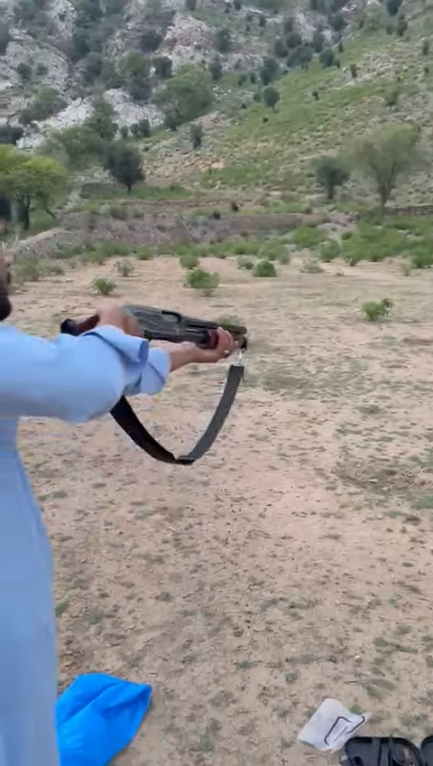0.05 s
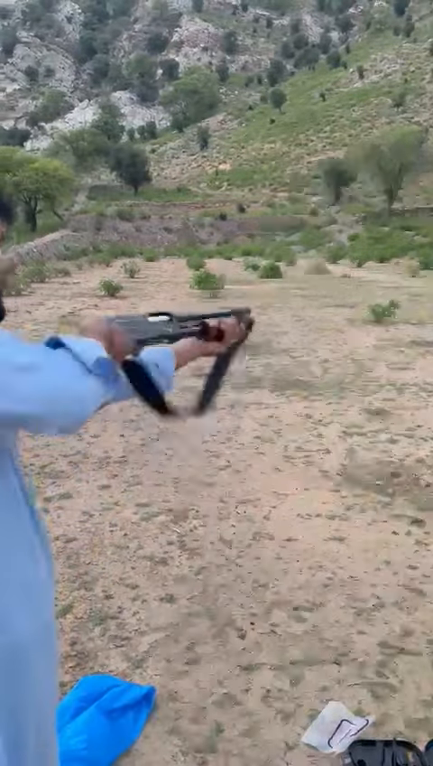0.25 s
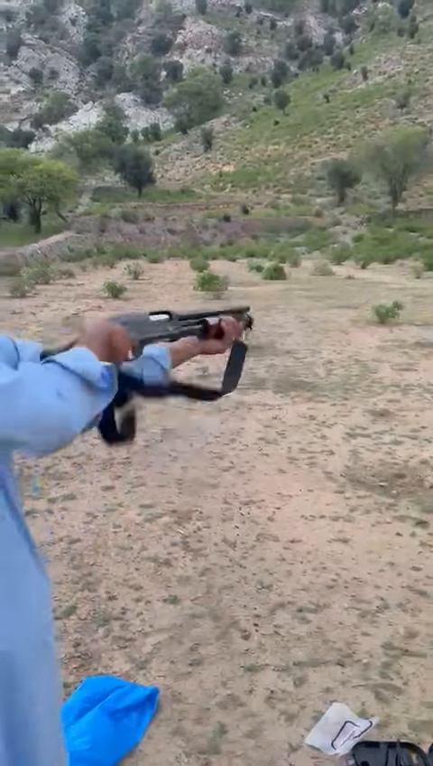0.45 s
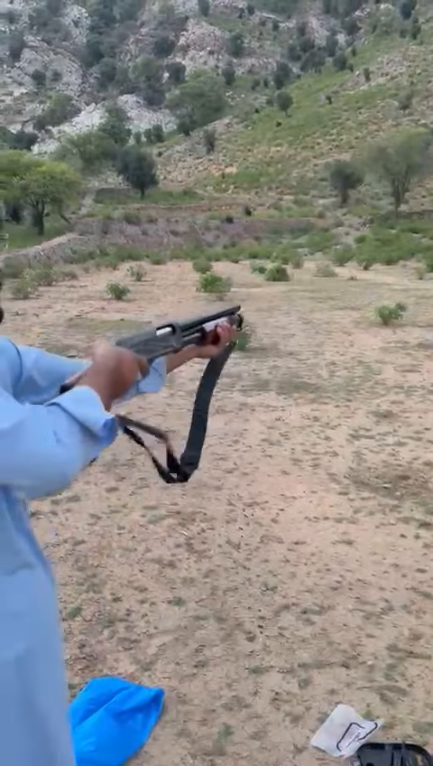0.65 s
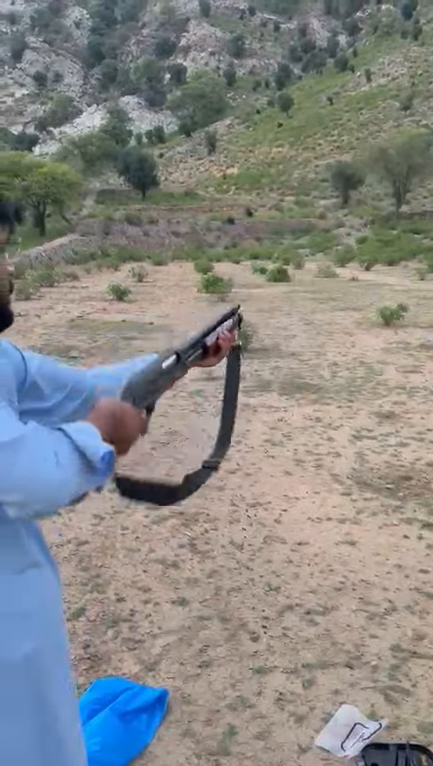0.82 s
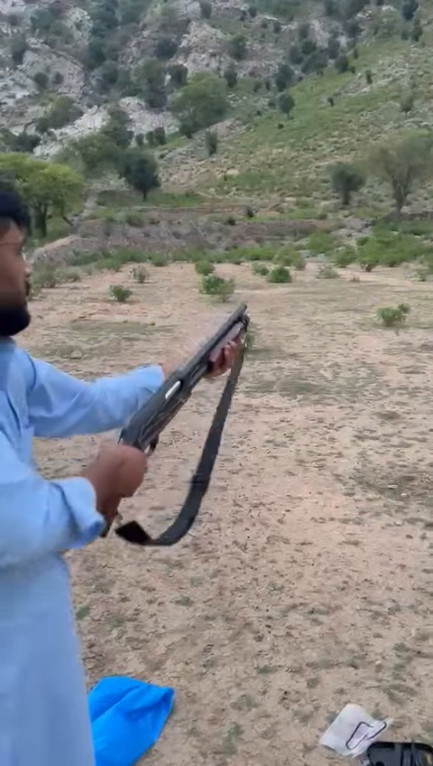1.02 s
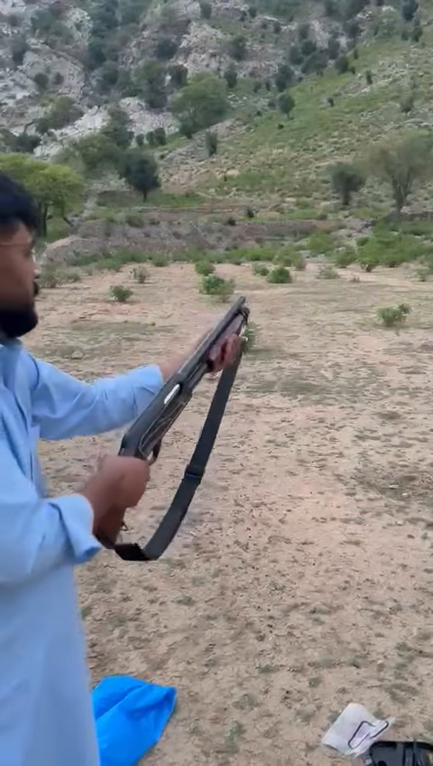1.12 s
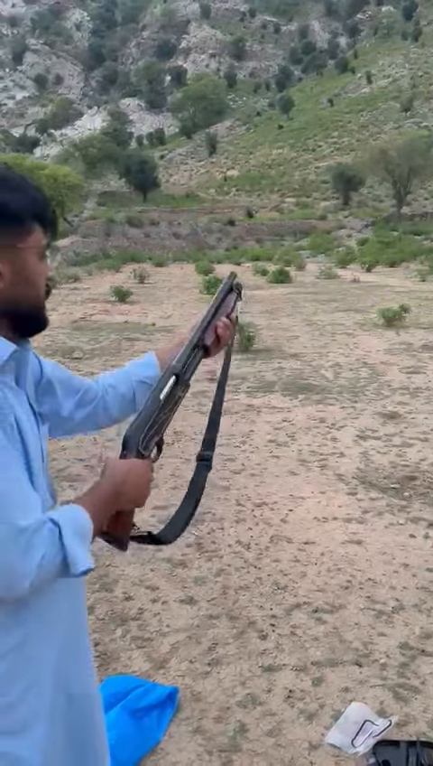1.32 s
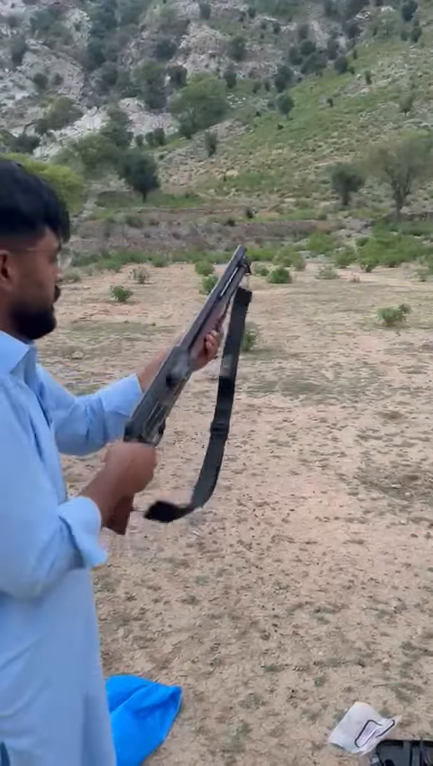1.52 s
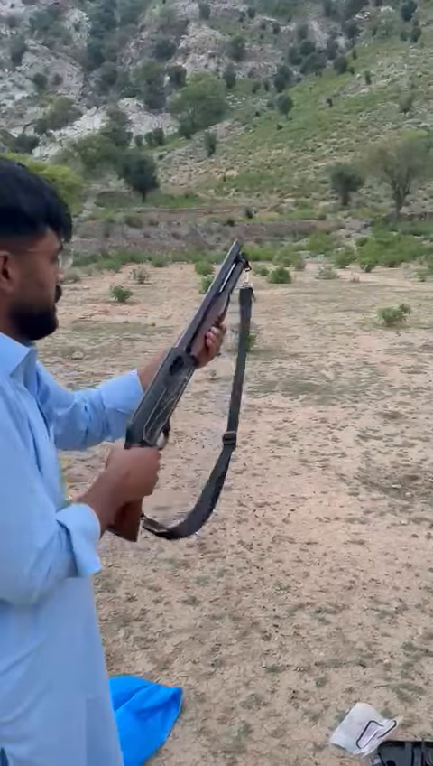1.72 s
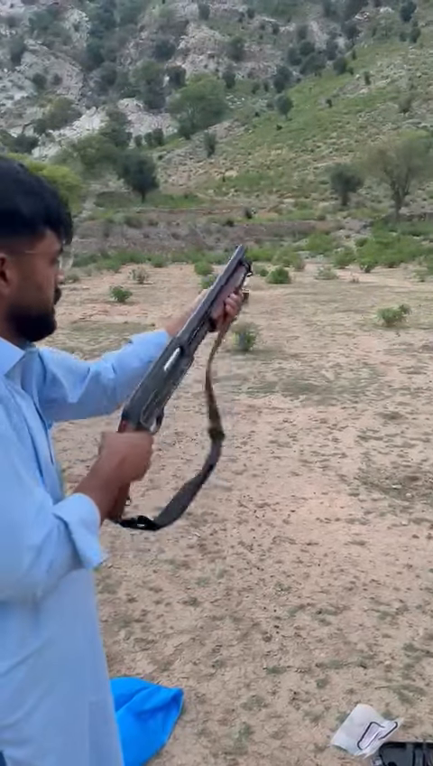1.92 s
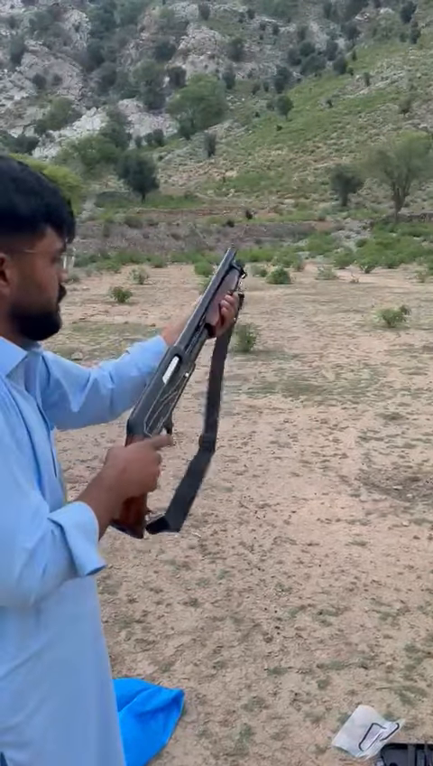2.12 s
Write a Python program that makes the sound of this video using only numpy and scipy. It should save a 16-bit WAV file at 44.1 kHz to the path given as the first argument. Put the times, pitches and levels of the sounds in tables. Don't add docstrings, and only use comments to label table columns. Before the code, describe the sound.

A single close shotgun shot in open hilly country, with thumping reflections and a long, slowly darkening echo; over it the steel pump scrapes and slams back, then forward. Phone microphone, slight hiss.

```python
import sys
import numpy as np
from scipy import signal
from scipy.fft import rfft, irfft, next_fast_len
from scipy.io import wavfile
from scipy.ndimage import uniform_filter1d

SR = 44100
rng = np.random.default_rng(int(sys.argv[2]) if len(sys.argv) > 2 else 0)


def put_to_file(sound):
    columns = np.atleast_2d(sound).T
    safe = np.clip(columns, -1, 1)
    whole_steps = np.round(safe * 32767)
    wavfile.write(sys.argv[1], SR, whole_steps.astype(np.int16))


def ratio_of_db(decibels):
    return 10 ** (np.asarray(decibels, float) / 20)


N = 94815
T = np.arange(N) / SR
SHOT_S = 0.2346
NEAR_LAG_S, FAR_LAG_S = 0.0004, 0.00015

# [f/Hz, level per Hz/dB]
CRACK_COLOUR = [(120, -7), (200, -3), (680, -3.5), (1500, -7.5), (3000, -7), (6000, -14.5), (8500, -18.5),
                (12000, -35)]
# [f/Hz, level per Hz/dB]
SNAP_COLOUR = [(800, -23.5), (2400, -17), (4300, -17), (7000, 2.5), (8600, 6), (10500, 4), (12000, -28)]
# [t/s, peak level/dB, length/s]
WAVE_SPIKES = [
    (.2492, -12, .0005),
    (.2541, -11, .0003),
    (.2553, -4, .00013),
    (.2583, -6, .00017),
    (.2609, -12, .00013),
    (.2722, -10, .0017),
]
# [centre t/s, peak level/dB, f/Hz, length/cycles]
GROUND_THUMPS = [(0.2505, -12, 668, 5.8), (.2565, -16.5, 700, 3.7), (.266, -12, 286, 1.4),
                 (0.2782, -10, 230, 0.51), (0.31, -14.5, 52.6, 1.1), (0.331, -25, 51, 0.93),
                 (.39, -15.5, 211, 1.1), (0.557, -17, 243, 4), (.571, -17, 136, 2.7),
                 (0.583, -11, 106, 0.52), (0.628, -17, 279, 4.4), (.641, -13.5, 192.3, 2.3),
                 (0.661, -25, 90, 1.6), (0.677, -10.5, 165, 0.89), (0.818, -16, 149, 1.51),
                 (1.309, -30.5, 90.7, 2.6), (1.648, -28, 330, 2.9), (1.67, -26, 304, 2.5)]
# [f/Hz, level per Hz/dB]
BOOM_COLOUR = [(15, -45.5), (25, -24.5), (48, 9.5), (108, -4.5), (220, -3), (700, -20.5), (910, -55.5),
               (1540, -120)]
# [start t/s, level/dB, rise/s, T60/s]
SLOPE_RETURNS = [
    (0.264, -24.5, 0.006, 0.34),
    (0.329, -40, 0.052, 1.33),
    (0.515, -37, 0.022, 0.75),
    (0.605, -35, 0.016, 0.17),
    (.665, -38.5, 0.0069, 0.79),
]
# [f/Hz, level per Hz/dB]
SCATTER_COLOUR = [(350, -27.5), (550, -9), (1600, -8.5), (2500, -13), (2900, -15), (4000, -14), (7700, -19),
                  (8400, -26), (9500, -57.5)]
# [start t/s, level/dB, rise/s, T60/s]
SLOPE_SLAPS = [
    (0.537, -30.5, 0.004, 0.05),
    (0.62, -30, 0.012, 0.063),
    (0.6674, -28.5, 0.002, 0.06),
    (0.69, -41.5, 0.0052, 1),
    (0.66, -37, 0.00285, .03),
    (.636, -32.5, .003, .04),
]
# [f/Hz, level per Hz/dB]
ROLL_COLOUR = [(15, -67.5), (25, -11), (86, 5.5), (156, 2.5), (273, -6), (400, -17), (520, -15.5),
               (880, -120)]
# [f/Hz, T60/s]
ROLL_DECAY = [(40, 3.5), (100, 10.2), (200, 4.9)]
# [f/Hz, level per Hz/dB]
VALLEY_COLOUR = [(350, -25), (630, -2.5), (1240, -5.5), (2400, -15), (2900, -18), (3800, -16.5),
                 (7800, -38.5), (8500, -72.5)]
# [f/Hz, T60/s]
VALLEY_DECAY = [(600, 20), (1500, 8.6), (4000, 4.6), (8000, 5.5)]
# [t/s, centre f/Hz, level/dB]
HUMP_PATH = [(.6, 630, -55.5), (.9, 610, -44.5), (1.2, 430, -41.5), (1.45, 395, -38), (1.7, 336, -38),
             (2.15, 315, -41)]
# [t/s, peak level/dB, T60/s, tilt per octave/dB, f of the ringing part/Hz]
BACK_CONTACTS = [
    (1.4773, -21, 0.015, 0, 1930),
    (1.5045, -22.5, 0.019, -1, 1960),
    (1.5305, -29.5, 0.051, 0.5, 5030),
    (1.5355, -17.5, 0.037, 2, 4660),
    (1.5443, -1.5, 0.016, 1, 1710),
    (1.5505, -8, 0.016, 5, 4850),
    (1.5537, -20, 0.015, -8, 7870),
    (1.556, -23, 0.045, -14, 1850),
]
# [t/s, peak level/dB, T60/s, tilt per octave/dB, f of the ringing part/Hz]
FORTH_CONTACTS = [(1.7845, -38, 0.036, 1, 4470), (1.803, -32, 0.0094, -5, 4200),
                  (1.809, -21, .015, 2.5, 4500), (1.8172, -7, .01, 5.5, 5360),
                  (1.8226, -11, 0.0097, 4, 6700), (1.828, -17.5, 0.0089, 2, 7200),
                  (1.8456, -20, 0.019, -3.5, 1970), (1.8506, -16.5, 0.024, 2, 6460),
                  (1.8673, -23, 0.02, -4, 5000), (1.8743, -1, 0.019, 4, 3150), (1.8777, -6, 0.021, 0, 2280),
                  (1.8843, -14, 0.012, 0, 3000)]
# [f/Hz, bandwidth/Hz, level/dB]
BACK_MODES = [(687, 470, -10.5), (1050, 530, 1.5), (1700, 204, 1.5), (2630, 100, -40), (3780, 550, -8.5),
              (4730, 160, 3), (5730, 860, -12.5), (7970, 400, -2.5)]
# [f/Hz, bandwidth/Hz, level/dB]
FORTH_MODES = [(645, 180, 3), (1670, 130, 5.5), (2370, 340, -5.5), (3080, 180, 0), (3780, 220, -6.5),
               (5360, 330, -6), (6630, 210, -23), (8900, 210, -10)]
# [from t/s, to t/s, first level/dB, last level/dB]
SLIDE_SCRAPES = [
    (1.464, 1.547, -47, -30.5),
    (1.772, 1.81, -54, -57),
    (1.815, 1.876, -36, -35),
]
# [t/s, level/dB, T60/s]
RATTLES = [
    (1.557, -42, 0.47),
    (1.883, -47.5, 0.51),
]
# [f/Hz, level per Hz/dB]
SCRAPE_COLOUR = [(700, -43.5), (1300, -2), (2600, 1), (4200, -1), (8500, -6.5), (10000, 14.5),
                 (16000, -23.5)]
# [t/s, level/dB, f/Hz, T60/s, tonal share]
TRIGGER_TICKS = [
    (.078, -69, 2100, 0.088, 0.11),
    (.14, -55, 770, 0.053, 0.88),
    (.14, -69, 2100, 0.045, .1),
    (.202, -64.5, 4000, 0.095, 0.1),
]
# [t/s, level/dB, length/s, lowest f/Hz, highest f/Hz]
TREBLE_TIPS = [
    (1.472, -56, 0.00506, 9600, 12300),
    (2.5, -49, 0.0015, 10000, 12300),
    (1.7, -53, 0.0016, 9900, 10800),
    (1.8752, -46.5, .0011, 9100, 16500),
    (1.89, -62, .006, 10600, 11400),
    (1.2, -64, .008, 9600, 13000),
    (0.265, -46, 0.013, 8800, 11200),
    (1.554, -58, .001, 9600, 14000),
]
# [f/Hz, level per Hz/dB]
HISS_COLOUR = [(25, -16), (70, 5), (200, -15.5), (500, -20.5), (5300, -37), (7000, -17), (9300, -11.5),
               (10000, -44)]
# [f/Hz, side over middle level/dB]
AIR_WIDTH = [(60, -39.5), (180, -25), (560, -16.5), (970, -13), (1700, -22), (2900, 4.5), (4500, -2),
             (5600, -14), (7000, -5), (9000, 9)]
# [f/Hz, side over middle level/dB]
MUZZLE_WIDTH = [(100, -19), (500, 4.5), (3000, -5), (8000, 8.5)]
# [f/Hz, side over middle level/dB]
STEEL_WIDTH = [(500, -5), (1700, -33), (3000, -9), (5100, -2), (5800, -14), (9000, 6)]
# [f/Hz, gain/dB]
MIC_TOP = [(8400, 0), (9300, -10), (9700, -40), (11000, -75)]
# [f/Hz, width/Hz, raised threshold/dB]
WEAK_BANDS = [(2900, 250, 14), (4800, 200, 13), (8500, 400, 8)]


def blast():
    rise_s, hold_s, t60 = 0.014, 0.013, 0.02
    since = T - SHOT_S
    fall = ratio_of_db(-60 * np.clip(since - rise_s - hold_s, 0, None) / t60)
    body = np.clip(since / rise_s, 0, 1) ** 2.8 * fall
    left, right = ratio_of_db(-15.5) * body * rush(table(CRACK_COLOUR), MUZZLE_WIDTH, size=256)
    push = np.array([np.roll(left, round(NEAR_LAG_S * SR)), right])
    for s, db, length in WAVE_SPIKES:
        u = (lagged(FAR_LAG_S) - s) / length
        push += ratio_of_db(db) * (1 - u * u) * np.exp(-u * u / 2)
    sag, dip_turns = 0.12, 0.38
    for s, db, hz, cycles in GROUND_THUMPS:
        lag = NEAR_LAG_S if s < 0.29 else FAR_LAG_S
        u = (lagged(lag) - s) * hz / cycles
        turns = cycles * (u - sag * u * u / 2) + dip_turns
        push += ratio_of_db(db) * np.exp(-4 * u * u) * np.cos(2 * np.pi * turns)
    return push


def snap():
    envelope = swell(0.2525, rise=0.0066, t60=0.033)
    return ratio_of_db(-18) * envelope * rush(table(SNAP_COLOUR), MUZZLE_WIDTH, patchy_db=4.8, size=256)


def stroke(contacts, modes, ring_db, crack_db):
    size, lead = 4096, 128
    out, t = np.zeros((2, N + SR)), np.arange(size) / SR
    f = np.fft.rfftfreq(size, 1 / SR)
    ring = 0
    for k, (c, w, db) in enumerate(modes):
        ring = ring + (-1) ** k * ratio_of_db(db) * 1j * f * w / (c * c - f * f + 1j * f * w)
    crack = ratio_of_db(crack_db + along(SCRAPE_COLOUR, f))
    turn = np.arctan(ratio_of_db(along(STEEL_WIDTH, f)))
    for s, db, t60, tilt_db, part_hz in contacts:
        burst = rfft(rng.standard_normal((2, size)) * swell(lead / SR, 0.00084, t60, t))
        burst = burst / np.sqrt(np.abs(uniform_filter1d(np.abs(burst) ** 2, size=24)) + 1e-12)
        part_db = 7.5 * np.exp(-(np.log2((f + 1) / part_hz) / 0.14) ** 2)
        tilt = ratio_of_db(tilt_db * np.log2((f + 99) / 3000) + part_db)
        colour = (ratio_of_db(ring_db + db) * ring + crack) * tilt
        mid, side = irfft(turned(burst) * colour * [np.cos(turn), np.sin(turn)])
        crest = np.sqrt(np.sum(mid ** 2) / (0.02 * t60 * SR))
        hit = ratio_of_db(db) * (t < 0.06) * np.array([mid + side, mid - side]) / crest
        start = round(s * SR) - lead
        out[:, start:start + size] += hit
    return out[:, :N]


def pump():
    drag = 0
    for a, b, from_db, to_db in SLIDE_SCRAPES:
        drag = drag + (T > a) * (T < b) * ratio_of_db(np.interp(T, [a, b], [from_db, to_db]))
    for s, db, t60 in RATTLES:
        drag = drag + ratio_of_db(db) * swell(s, 0.0039, t60)
    back = stroke(BACK_CONTACTS, BACK_MODES, ring_db=6, crack_db=-7)
    forth = stroke(FORTH_CONTACTS, FORTH_MODES, ring_db=4, crack_db=-9)
    return back + forth + drag * rush(table(SCRAPE_COLOUR), STEEL_WIDTH, 2.3, size=256)


def tips():
    out = 0
    for s, db, length, lo_hz, hi_hz in TREBLE_TIPS:
        def colour(f, t):
            fall = 34 * np.log2(np.maximum(f / lo_hz, 1))
            return -90 * ((f < lo_hz) | (f > hi_hz)) - fall + 0 * t
        fleck = np.exp(-((T - s) / length) ** 2)
        out = out + ratio_of_db(db) * fleck * rush(colour, STEEL_WIDTH, size=256)
    return out


def slopes():
    boom = ratio_of_db(-24) * swell(0.2438, 0.01, 2.35) * rush(table(BOOM_COLOUR), AIR_WIDTH, 4.8, size=2048)
    scatter = summed(SLOPE_RETURNS) * rush(table(SCATTER_COLOUR), AIR_WIDTH, 2.4, size=256)

    def dull(hz, t):
        return -6 * (np.log2((hz + 1) / 1240) / 0.85) ** 2 + 0 * t
    slap = summed(SLOPE_SLAPS) * rush(dull, AIR_WIDTH, 0.73, size=256)
    return boom + scatter + slap


def valley():
    def dying(t60s):
        return lambda hz, t: ratio_of_db(-60 * (t - 1.2) / along(t60s, hz))
    late = np.clip((T - 0.3) / 0.4, 0, 1)
    roll = ratio_of_db(-38) * rush(table(ROLL_COLOUR), AIR_WIDTH, 3.6, dying(ROLL_DECAY), size=2048)
    wash = ratio_of_db(-46) * rush(table(VALLEY_COLOUR), AIR_WIDTH, 2.67, dying(VALLEY_DECAY))
    s, centre, db = np.transpose(HUMP_PATH)

    def bell(hz, t):
        octaves = np.log2((hz + 1) / np.interp(t, s, centre))
        return np.maximum(-6 * (octaves / 0.37) ** 2, -90)
    hump = ratio_of_db(np.interp(T, s, db)) * (T > 0.4) * rush(bell, AIR_WIDTH, 3.9)
    return late * (roll + wash) + hump


def trigger():
    out = 0
    for s, db, hz, t60, ring in TRIGGER_TICKS:
        def colour(f, t):
            return -16 * np.log2((f + 1) / hz) ** 2 + 0 * t
        tone = ring * np.sin(2 * np.pi * hz * T)
        noise = (1 - ring) * rush(colour, AIR_WIDTH, size=256)
        out = out + ratio_of_db(db) * swell(s, 0.001, t60) * (tone + noise)
    return out


def microphone_hiss():
    return ratio_of_db(-68 + 3 * (T > SHOT_S)) * rush(table(HISS_COLOUR), AIR_WIDTH, size=4096)


def unit(x):
    return x / np.sqrt(np.mean(x ** 2) + 1e-20)


def along(points, hz):
    f, v = np.transpose(points)
    return np.interp(np.log(hz + 1), np.log(f + 1), v)


def table(points):
    return lambda hz, t: along(points, hz) + 0 * t


def swell(s, rise, t60, t=T):
    u = np.clip(t - s, 0, None)
    return np.clip(u / rise, 0, 1) ** 2 * ratio_of_db(-60 * np.clip(u - rise, 0, None) / t60)


def summed(returns):
    return np.sqrt(sum((ratio_of_db(db) * swell(s, rise, t60)) ** 2 for s, db, rise, t60 in returns))


def lagged(lag):
    return T - np.array([[lag / 2], [-lag / 2]])


def turned(z):
    share = 0.3
    return np.array([z[0], np.sqrt(share) * 1j * z[0] + np.sqrt(1 - share) * z[1]])


def rush(shape_db, width, patchy_db=0, fade=None, size=1024):
    hz, t, z = signal.stft(rng.standard_normal((2, N)), SR, nperseg=size)
    hz = hz[:, None]
    field = rng.standard_normal(z.shape[1:])
    field = unit(uniform_filter1d(uniform_filter1d(field, 5, 0), 3, 1))
    turn = np.arctan(ratio_of_db(along(width, hz)))
    gain = ratio_of_db(shape_db(hz, t) + patchy_db * field)
    gain = gain / np.sqrt(np.mean(gain ** 2, 0) + 1e-20)
    if fade is not None:
        gain = gain * fade(hz, t)
    z = turned(z) * gain * [np.cos(turn), np.sin(turn)]
    mid, side = signal.istft(z, SR, nperseg=size)[1][:, :N]
    return np.array([mid + side, mid - side])


def gate(x):
    middle_side = np.array([x[0] + x[1], x[0] - x[1]]) / 2
    hz, t, z = signal.stft(middle_side, SR, nperseg=1024)
    hz = hz[:, None]
    power = uniform_filter1d(np.abs(z) ** 2, 3, 2)
    band = 8 * uniform_filter1d(power, 8, 1)
    sway = unit(uniform_filter1d(uniform_filter1d(rng.standard_normal(z.shape), 8, 1), 7, 2))
    weak_db = sum(db * np.exp(-((hz - c) / w) ** 2) for c, w, db in WEAK_BANDS)
    threshold = power[0].sum(0) * ratio_of_db(-50 + weak_db + 4 * sway) ** 2
    kept = (band > threshold) | (hz < 1200)
    mid, side = signal.istft(z * kept, SR, nperseg=1024)[1][:, :N]
    return np.array([mid + side, mid - side])


def scene():
    return blast() + snap() + pump() + slopes() + valley() + trigger() + microphone_hiss()


def top_cut(x):
    return signal.sosfilt(signal.butter(12, 16600, fs=SR, output="sos"), x)


def record(dry):
    m = next_fast_len(N + 8192)
    response = ratio_of_db(along(MIC_TOP, np.fft.rfftfreq(m, 1 / SR)))
    dull = irfft(rfft(dry, m) * response, m)[:, :N]
    offset = -0.000044 * (T < 0.25)
    mix = gate(dull) + tips() + offset
    return top_cut(mix)


dry = scene()
out = record(dry)
put_to_file(out)
```